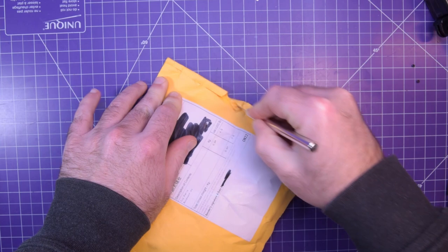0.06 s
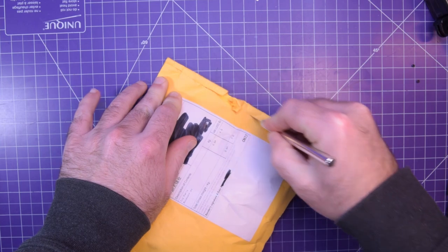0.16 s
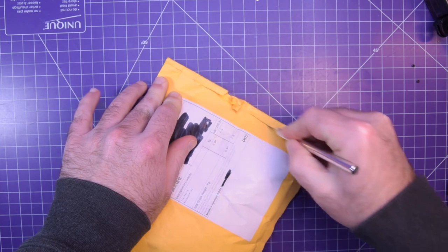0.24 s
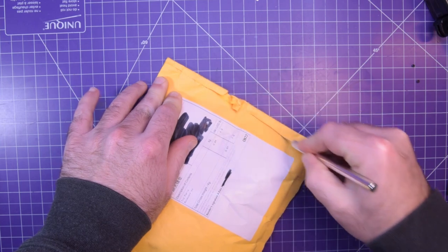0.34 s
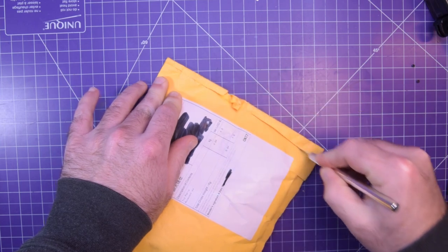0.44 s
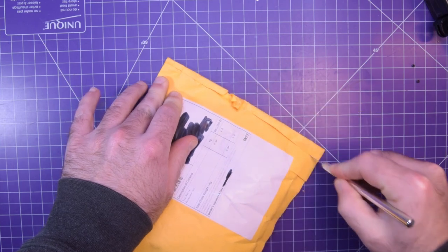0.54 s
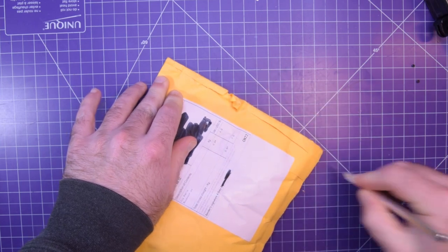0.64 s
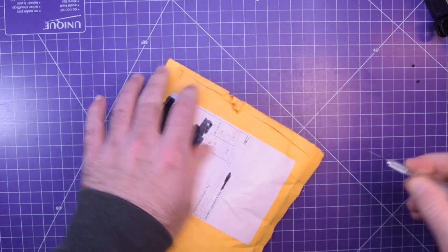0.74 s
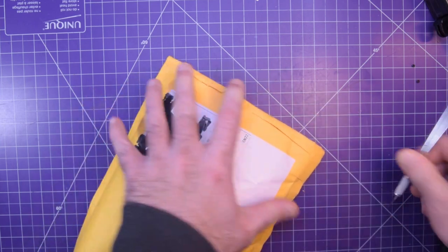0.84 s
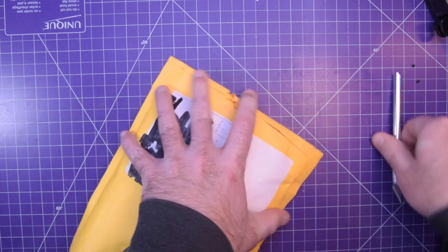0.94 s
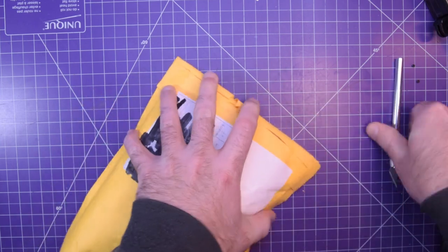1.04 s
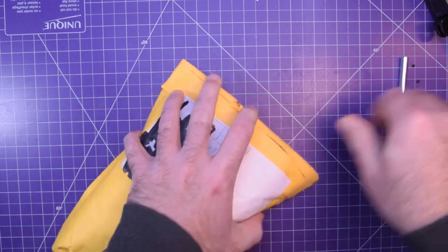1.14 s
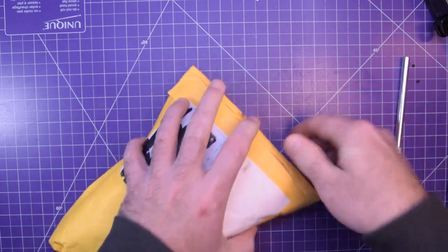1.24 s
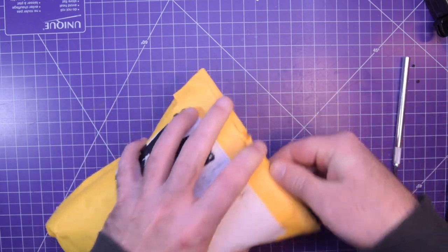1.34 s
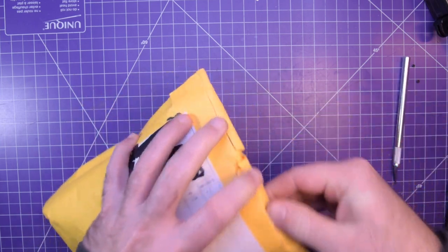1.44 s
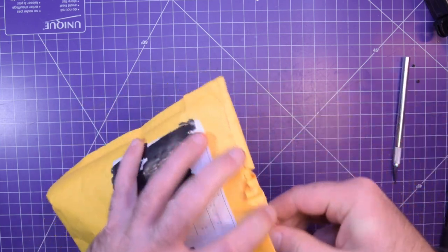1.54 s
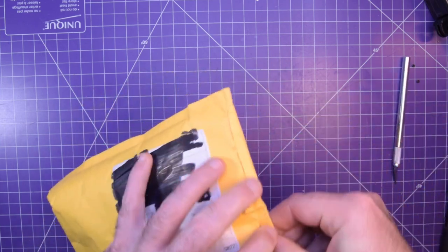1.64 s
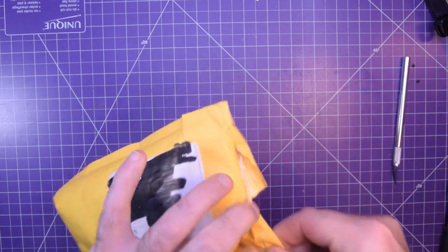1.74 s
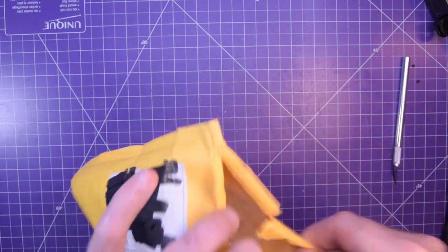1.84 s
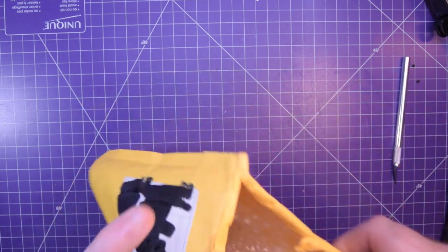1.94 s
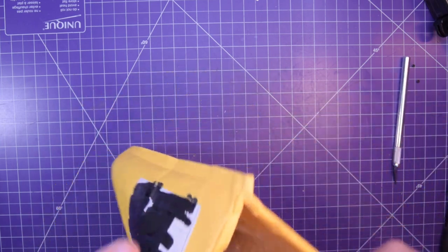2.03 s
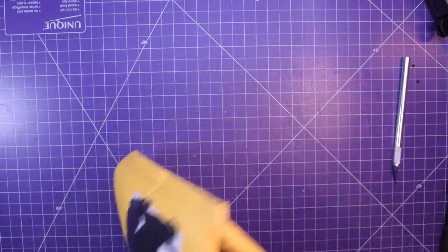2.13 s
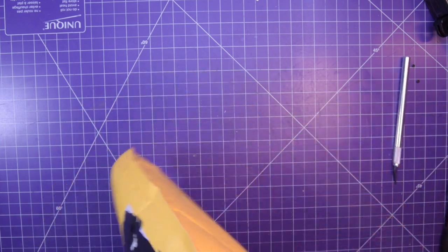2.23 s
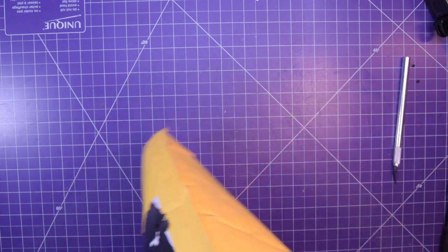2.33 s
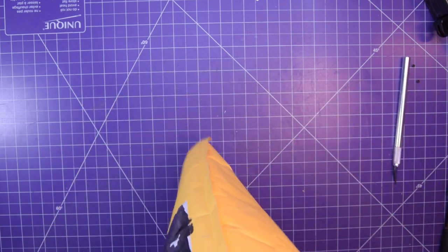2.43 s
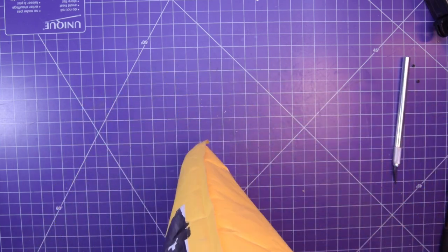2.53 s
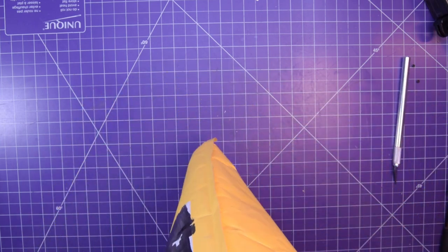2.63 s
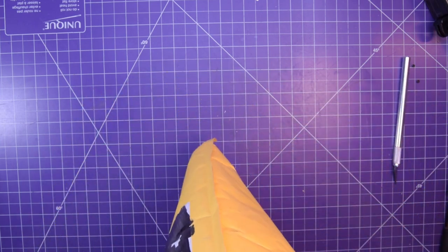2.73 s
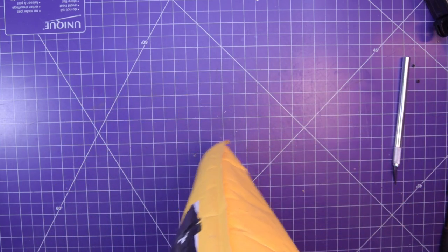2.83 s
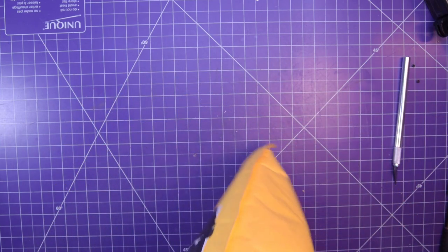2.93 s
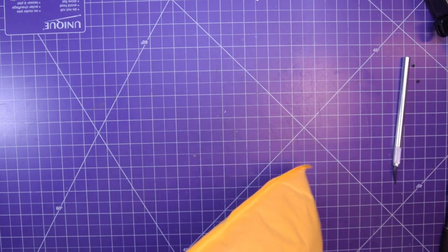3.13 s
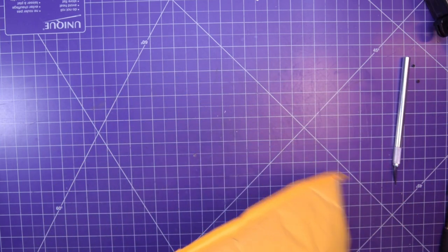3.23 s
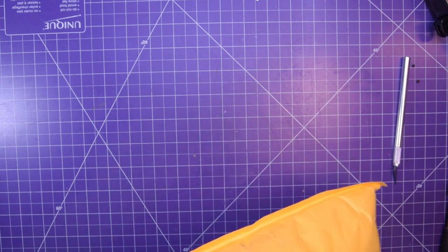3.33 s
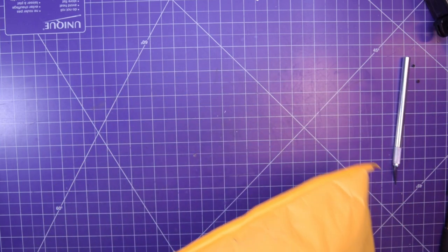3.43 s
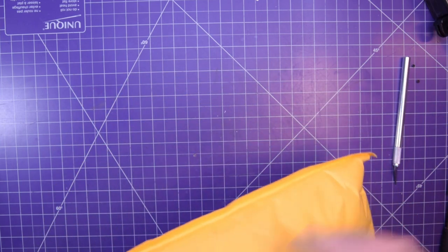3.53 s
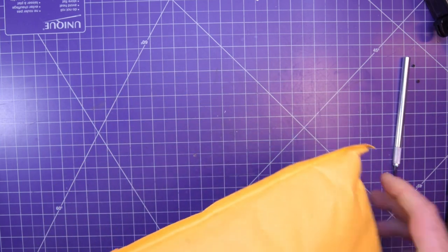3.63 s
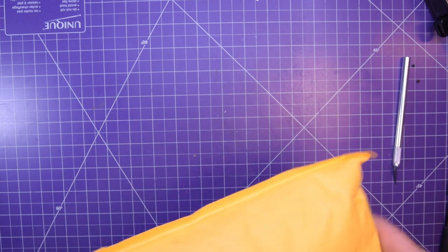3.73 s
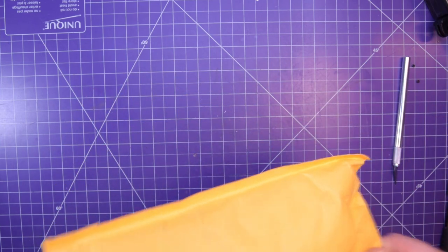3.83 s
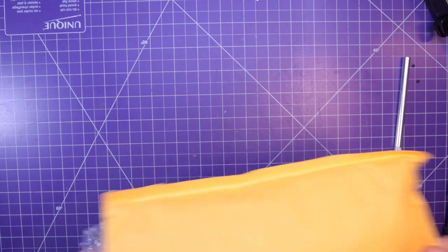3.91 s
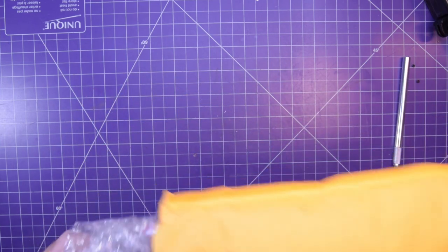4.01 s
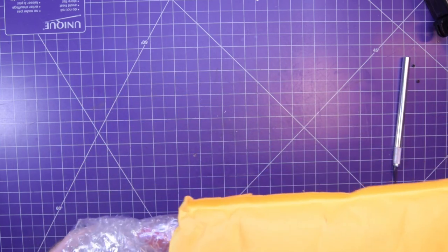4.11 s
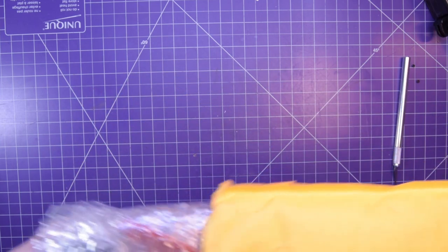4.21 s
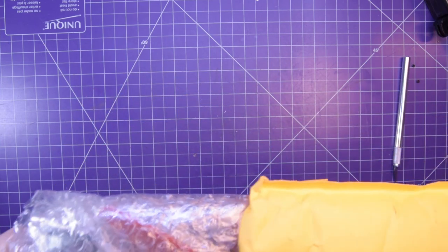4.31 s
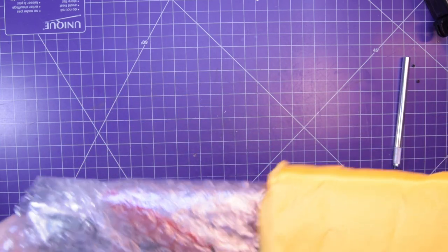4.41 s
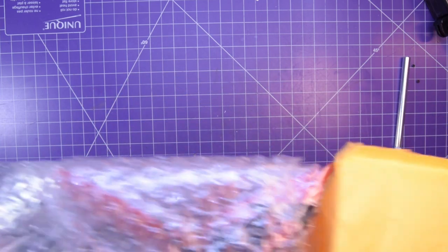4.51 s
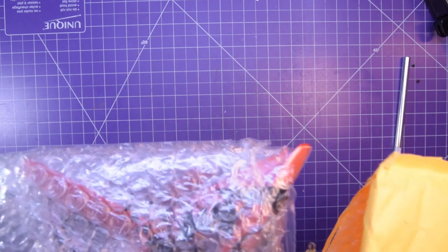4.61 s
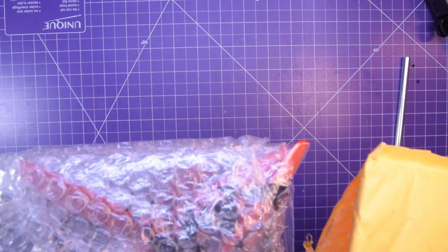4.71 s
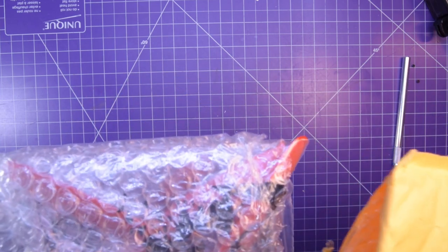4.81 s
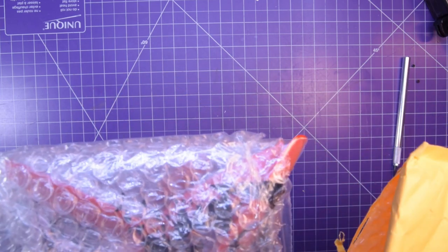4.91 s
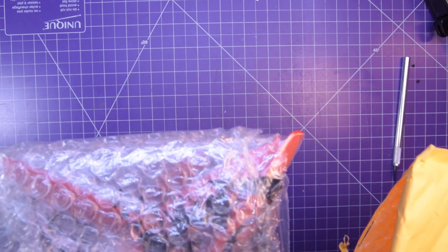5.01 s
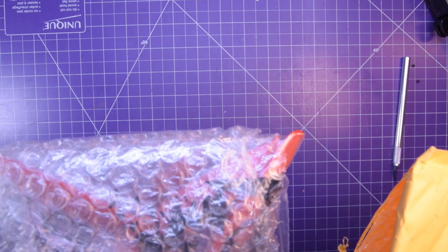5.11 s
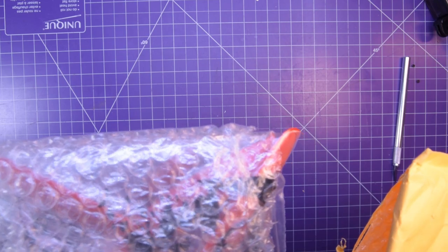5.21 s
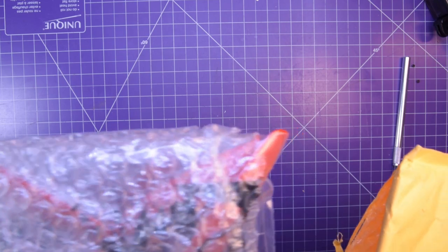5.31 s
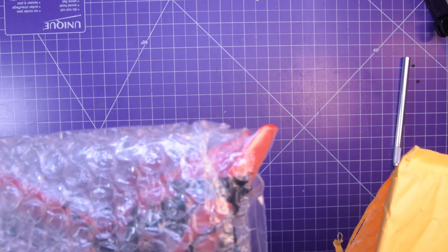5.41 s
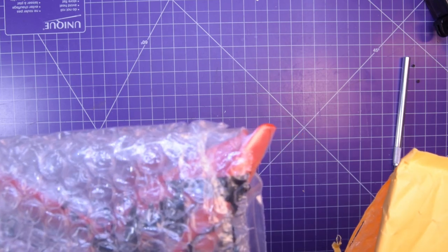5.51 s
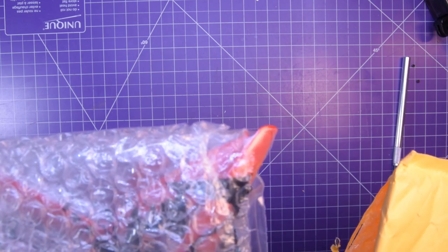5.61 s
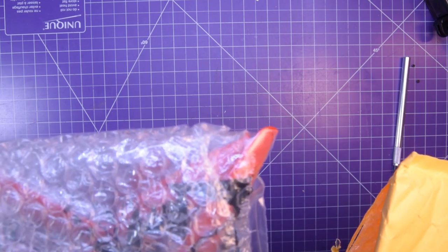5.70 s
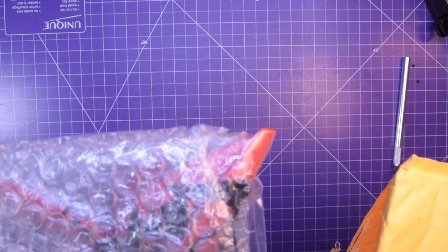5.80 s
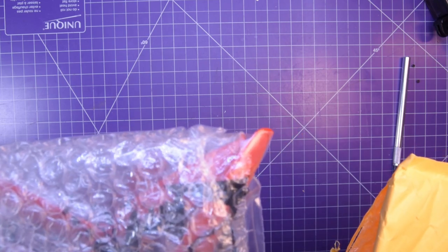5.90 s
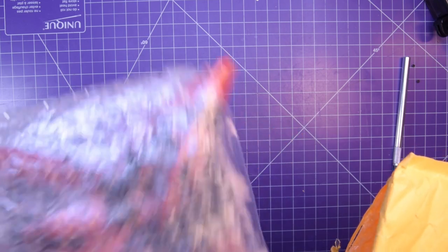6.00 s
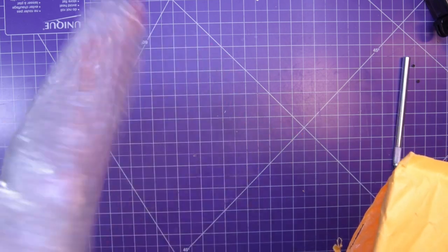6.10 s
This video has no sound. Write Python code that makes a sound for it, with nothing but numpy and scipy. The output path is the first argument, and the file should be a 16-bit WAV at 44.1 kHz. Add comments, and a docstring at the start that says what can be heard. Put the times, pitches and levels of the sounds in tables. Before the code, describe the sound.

Close up at a desk in a small, dry room: gritty paper cutting with small pops and a soft thud, then a hard little clatter as the knife lands on a mat. Stiff padded paper rustles, buckles and pops in dense bursts, with a lull midway. After the wrapped item slides free it is almost quiet, with only light plastic ticks and a last quick scrape over faint low rumble.

```python
"""A knife slits a padded paper mailer and lands with a short clatter; the mailer rubs, buckles and snaps open.
A bubble-wrapped item ticks and knocks in the hands and a faint breath glides, over a low rumble and faint hiss
in a small, dry room. Rubbing: random slips and smooth noise through surface colours and modes, levelled by hand
strokes. Blows: a crack and a noise flutter ring the object's modes. Thuds: low decaying sines. One microphone
hears all of it, with a desk reflection and a short noise-tail reverb."""
import sys
import numpy as np
from scipy import signal
from scipy.fft import rfft, irfft, next_fast_len
from scipy.io import wavfile
from scipy.ndimage import uniform_filter1d

SR = 44100
rng = np.random.default_rng(int(sys.argv[2]) if len(sys.argv) > 2 else 0)


def master_out(mix):
    """Clip the mix to full scale and print it as 16-bit PCM to the path in sys.argv[1]."""
    frames = np.transpose(np.atleast_2d(mix))
    ceiling = np.clip(frames, -1, 1)
    pcm = np.round(ceiling * 32767).astype(np.int16)
    wavfile.write(sys.argv[1], SR, pcm)


N = 271215

# Levels in the tables are relative: each source's own gain follows.
# edges of the zones body, flex, crackle, hiss: edge_hz
ZONE_EDGES_HZ = [200, 650, 1600, 4000, 14000]

# room rumble spectrum: freq_hz, level_db
RUMBLE_COLOUR = [(20, -32.5), (45, -25.5), (65, -20.5), (76, -6), (87, 5), (102, -4), (122, 3.5), (150, -1),
                 (195, -11), (260, -17), (400, -21), (700, -32.5), (1500, -38), (4000, -61)]
# faint hiss spectrum, room and channels: freq_hz, level_db
HISS_COLOUR = [(200, -2.5), (1000, -5), (3000, -6.5), (5000, 0), (10000, -6), (12000, -9.5), (15000, -43)]
CUTOFF_HZ = 15600
RADIATION_HZ = 70  # small sources radiate little below this

# Blow tables: ring and decay of each blow, level over 10 ms, spectral tilt and narrowing around the ring.
# wrapped item knocks under the fingers: start_s, ring_hz, decay_s, level_db, tilt_db_per_octave, focus_db_per_octave
ITEM_KNOCKS = [(5.1285, 1430, 0.0012, -37.5, 1.5, 11.5), (5.137, 5140, 0.0018, -56, 1, 6)]
# wrapped item resonances: freq_hz, width_hz, gain_db
ITEM_MODES = [(692, 41, 30.5), (1330, 150, 17), (1500, 130, 25), (2200, 88, 16), (2990, 260, 29),
              (3370, 240, 22), (4300, 200, 23), (5040, 180, 27)]
# finger presses an air cell: start_s, ring_hz, decay_s, level_db, tilt_db_per_octave, focus_db_per_octave
CELL_POPS = [(5.465, 2560, .002, -50, 2, 7), (5.467, 1700, 0.0025, -42.5, -3, 17),
             (5.4695, 1030, 0.0027, -51.5, 1.5, 23)]
# pressed cell resonances: freq_hz, width_hz, gain_db
POP_MODES = [(1030, 63, 10), (1330, 70, 6), (1700, 65, 12), (2100, 90, 4.3), (2420, 74, 4),
             (2750, 110, 5.5)]
FINGER_CUT_HZ = 2800
# bubble wrap ticks: start_s, ring_hz, decay_s, level_db, tilt_db_per_octave, focus_db_per_octave
WRAP_TICKS = [(2.629, 6450, 0.0015, -47.5, 15, 15), (2.6705, 6900, 0.002, -50, 10, 10),
              (2.7615, 4020, 0.0018, -61, 8, 3), (2.838, 1310, 0.004, -45.5, -1, 22),
              (2.8555, 5630, .003, -49, 4.5, 12), (4.6915, 1950, .0015, -46.5, -0.5, 3),
              (4.7235, 7000, .0012, -48, 2, 3), (4.7332, 3950, 0.0015, -38.5, 6, -2),
              (4.7535, 6500, .001, -56, 0, 3), (4.7741, 3950, 0.0053, -50, 7, 3),
              (4.7895, 2000, 0.0011, -53, 4, -4), (4.8205, 6500, 0.0019, -56, 5, 5),
              (4.837, 1550, .0015, -55, 3, 3), (5.1885, 3100, .002, -61, -4, 8),
              (5.3334, 6000, 0.0068, -66, 1, 9), (5.373, 1600, .0015, -58.5, -1, 3),
              (5.6043, 6420, .0038, -56, 3.5, 10), (6.0283, 1330, 0.0013, -39, 2, 18),
              (6.0885, 1400, 0.0018, -36, -2, 7), (6.1186, 2830, 0.0018, -20.5, 2, -1.5)]
# bubble wrap resonances: freq_hz, width_hz, gain_db
WRAP_MODES = [(692, 190, 4), (1480, 140, 6.7), (2010, 76, 8), (2870, 310, 1.06), (3950, 158, 9.4),
              (4390, 200, 3), (6420, 110, 10), (7250, 300, 2)]
# rubbed wrap spectrum: freq_hz, level_db
WRAP_COLOUR = [(200, -21.5), (500, -16.5), (900, -2), (1400, -5), (2500, -3.5), (4400, -9), (5500, -12.5),
               (8000, -11.5), (11000, -16), (15000, -37.5)]

# Stroke tables: swell is the level change over the hold.
# Positive heft is fuller and duller (flat palm), negative is thinner (edge).
# wrap settles and is held: start_s, length_s, level_db, swell_db, heft_db
WRAP_MOVES = [(4.69, 0.14, -69.5, -7, -7), (4.85, 1.22, -81.5, -6.5, 3)]
# wrap drags on the mat as it is lifted: start_s, length_s, level_db, swell_db, heft_db
WRAP_DRAGS = [(6.04, 0.048, -50.5, 0.5, -1.5), (6.098, .052, -52, 8, 0.5)]
# air cells under that drag: freq_hz, width_hz, gain_db
CELL_MODES = [(1400, 300, 16), (2100, 110, 0), (2920, 440, 5), (4350, 340, 0)]
# a faint breath: start_s, length_s, level_db, swell_db, heft_db, ring_start_hz, ring_end_hz
BREATHS = [(2.6, .035, -73, 3, -13, 1400, 1470), (2.645, 0.052, -76, 2, 4, 1526, 1560),
           (2.725, 0.036, -76, -1.5, -13, 1400, 1430), (2.772, 0.023, -78, -2, 0, 1480, 1520),
           (2.867, 0.064, -66.5, 5, 4, 1408, 1590)]
# resonances of the breath: multiple_of_lowest_resonance, width_hz, gain_db
BREATH_MODES = [(1, 169, 0.5), (1.74, 198, -13)]
# hands, desk and contents slide on the mailer: start_s, length_s, level_db, swell_db, heft_db
RUBS = [(0.794, 0.16, -59.5, -12.5, 7), (1.003, 0.14, -51.5, 1, 8.5), (1.165, 0.19, -51, -2, 8),
        (1.41, 0.18, -47.5, -2.5, 5), (1.613, 0.14, -48.5, 2.5, -1), (1.805, 0.059, -36.5, 5, 1.5),
        (1.889, 0.14, -43.5, -9, -4), (2.03, 0.15, -53.5, 4, -1), (2.17, 0.11, -50.5, 9, 0),
        (2.343, 0.037, -43.5, 4, 2), (2.404, 0.11, -47.5, 4.5, -12.5), (2.938, 0.11, -50.5, 0, -8.5),
        (3.058, 0.16, -48, 13, -6.5), (3.276, 0.18, -47, -9.5, -2), (3.444, 0.11, -48, 14, 0),
        (3.658, 0.22, -60, -15, 1.5), (3.843, 0.11, -42, 5.5, 2), (3.981, 0.2, -41, -4.5, 1),
        (4.216, 0.044, -48.5, 4, 0.5), (4.29, 0.078, -42, -1, 0.5), (4.388, 0.17, -51.5, 1, -4.5),
        (4.525, 0.1, -43, 4.5, -0.5)]
# rubbed mailer spectrum: freq_hz, level_db
MAILER_COLOUR = [(88, -39), (150, -22), (239, -7), (428, -2.5), (572, -5), (912, -7), (1110, -6.5),
                 (1540, -6), (2410, -11.5), (2810, -12.5), (3690, -12.5), (7000, -12), (10700, -16.5),
                 (13000, -24), (15500, -47.5)]
# mailer resonances: freq_hz, width_hz, gain_db
MAILER_MODES = [(458, 39, -0.5), (741, 51, -3), (915, 120, -9), (1500, 47, -4), (2770, 260, -3),
                (4130, 67, -2.5)]
# mailer buckles: start_s, ring_hz, decay_s, level_db, tilt_db_per_octave, focus_db_per_octave
PAPER_SNAPS = [(0.715, 490, 0.0052, -41, -3, -1), (0.8007, 716, 0.0025, -33.5, 3.5, 7.5),
               (0.805, 750, 0.0026, -34.5, -0.5, 10), (0.9125, 810, 0.01, -44.5, 6, 12),
               (1.2772, 474, 0.0016, -29, 2.2, 10), (1.3485, 483, 0.0014, -26.5, -0.8, 8),
               (1.383, 760, 0.0068, -38.5, 2, 9), (1.432, 520, 0.0046, -36.5, -2.5, 8),
               (1.503, 700, 0.0018, -43, -3, 5), (1.4607, 5800, 0.0072, -31.5, 30, 21),
               (1.5405, 1190.0, 0.0049, -33.5, -0.5, 11), (1.5525, 846, 0.0031, -37, -3, -2),
               (1.7445, 2900, 0.0026, -40.5, 1, 5), (1.627, 1920, 0.0021, -28, 0.3, 6),
               (1.7111, 6740, 0.004, -37, 4, -2), (1.8004, 1220, 0.0085, -28, -0.5, 1.5),
               (1.8205, 830, 0.0024, -25, 2, 10), (1.8418, 500, 0.0052, -29, -8, 4.5),
               (1.8625, 1120, 0.008, -22, -2.5, 1.5), (1.8945, 865, 0.0041, -32.5, -6, 16),
               (1.984, 900, 0.0031, -42, -2, -5), (1.8555, 696, 0.004, -33, -2, 5),
               (1.9125, 1500.0, 0.006, -27.5, -1.5, 1.5), (1.9431, 1410, 0.0055, -25.5, -6, 16.5),
               (1.9915, 2050, 0.0025, -34.5, 1.5, -9), (1.995, 915.0, 0.0031, -25.5, -0.5, 5.5),
               (2.122, 1690, 0.0031, -46.5, -2, 11), (2.372, 890, 0.0015, -42, 4.5, 8),
               (2.158, 1400.0, 0.01, -34, -0.5, 2.5), (2.277, 1160, 0.0029, -38, -1, 8.5),
               (2.47, 663, 0.0029, -39, -3.5, -6), (2.9365, 1300, 0.0074, -43, 0.5, 6),
               (3.0019, 2250, 0.00095, -22.5, 3.5, 6.5), (3.0025, 3202, 0.0033, -25.5, 0.5, 7.5),
               (3.2082, 2420, 0.0021, -27.5, -2, 8.5), (3.2766, 1620, 0.0028, -35.5, -10, 16.5),
               (3.2868, 860, 0.0032, -27.5, 0.5, 9.5), (3.3045, 1000, 0.0012, -38.5, 1, 7),
               (3.4635, 1500, 0.0039, -38.5, 1, 6), (3.472, 900, 0.0015, -41, -3, 25),
               (3.5355, 845, 0.0017, -35, 1, 20), (3.5709, 2680, 0.0058, -33, -0.5, 1.5),
               (3.574, 3750, 0.017, -33, 4.5, 5), (3.5755, 490, 0.0041, -28, -4, 8),
               (3.592, 340, 0.0046, -39, 1, 10), (3.6838, 1210, 0.0013, -22.5, -0.5, 5),
               (3.6855, 520, 0.004, -29.5, 2.5, 5.5), (3.7624, 467, 0.0081, -42, 0, 3.5),
               (3.847, 445, 0.0037, -33.5, -5.5, -3), (3.861, 680, 0.0015, -33, -3.5, -1),
               (3.8675, 1000, 0.0012, -46, 4, 6), (3.8707, 1460, 0.0049, -28, -0.9, 5),
               (3.9036, 3100, 0.0046, -31.5, -7, 6.5), (3.9276, 950, 0.0043, -26, -2, -3),
               (3.9325, 1310, 0.0023, -42, 1.5, 8), (3.962, 450, .003, -33.5, -7, 13),
               (4.0105, 2400, 0.0021, -32.5, -7, 5), (4.0225, 2900, 0.0043, -36, -2, 8),
               (4.0335, 1290, 0.0032, -34, 2, 6), (4.0997, 1110, 0.0025, -34.5, -3, -4),
               (4.139, 1270, 0.0042, -36, 0.5, 2), (4.177, 1120, 0.0024, -39.5, -2.5, -4),
               (4.3, 1190, .002, -42, 4, 11), (4.0825, 736, 0.0031, -28.5, -1.5, 9),
               (4.122, 367, 0.0081, -35.5, 1, 22), (4.1632, 2150, 0.0021, -35.5, 1, 0.5),
               (4.2868, 318, 0.003, -32, -3.5, -4), (4.3287, 1610, 0.0069, -28, -3.5, 14),
               (4.6065, 2750.0, 0.0047, -29, 2.5, 6), (4.6095, 2750, .0012, -35, 1, -2),
               (4.6255, 1160, .002, -38, -2, -1), (4.637, 1340, 0.0052, -33, -4.5, 7),
               (4.641, 440, .004, -36.5, -2.5, 5)]
# spectrum shared by all blows, before zone balancing: freq_hz, level_db
SNAP_COLOUR = [(30, -51), (90, -21), (170, -17.5), (310, -4), (400, -1.5), (600, -3), (900, 3.5),
               (2700, 5.5), (4200, -0.5), (5500, -5.5), (8000, -8.5), (11000, -13), (13000, -25),
               (15000, -41.5)]
# heavier pushes thud on the desk: start_s, ring_hz, decay_s, level_db
THUDS = [(0.239, 167, 0.012, -24), (0.711, 248, 0.0059, -26.5), (1.054, 200, 0.013, -33.5),
         (1.145, 241, 0.011, -31), (2.935, 338, .018, -36), (3.573, 245, 0.0072, -22.5),
         (4.12, 253.5, 0.01, -31), (4.283, 249, 0.0051, -26)]
THUD_RISE_S = 0.003
# knife lands and bounces: start_s, ring_hz, decay_s, level_db, tilt_db_per_octave, focus_db_per_octave
KNIFE_DOWN = [(1.0503, 2200, 0.0057, -21, 0, 5), (1.0535, 3940, .006, -39, 5, 9.5),
              (1.0675, 2200, 0.004, -27, -0.5, 5), (1.0762, 2200, 0.0022, -32, -4.5, 9.5),
              (1.0825, 1900, 0.006, -35.5, -1.5, 7), (1.1396, 1820, 0.004, -22.5, -3.5, 6.5),
              (1.1432, 2100, 0.0049, -23.5, -6.5, 10), (1.1535, 1500, 0.008, -34, -5, 9.5),
              (1.1708, 1117, 0.0088, -33, -1, 2)]
# knife handle on the cutting mat: freq_hz, width_hz, gain_db
KNIFE_MODES = [(480, 55, -0.5), (765, 60, -2.5), (1000, 80, 1.5), (1510, 90, -1.5), (1930, 60, 3.5),
               (2250, 70, 9.5), (2580, 130, 2.5), (3270, 63, 3.5), (4020, 45, -2), (4950, 260, 6.5)]
# blade pulls through the paper: start_s, length_s, level_db, swell_db, heft_db
CUTS = [(0.0, 0.076, -40.5, 0.5, 4), (0.107, 0.058, -42.5, 5.5, -11), (0.247, 0.13, -40, -1, 4),
        (0.411, 0.14, -40, -1.5, 4.5), (0.563, 0.071, -43.5, -3.5, 1), (0.66, 0.018, -43, 4, 7.5),
        (0.695, 0.0076, -43, -6, -2)]
# slit paper spectrum: freq_hz, level_db
SLIT_COLOUR = [(88, -20), (150, -8), (274, -24), (428, -10.5), (631, -15), (722, -13), (912, -3),
               (1130, -5), (1370, -2.5), (2100, -9), (2600, -7.5), (3900, -12), (5030, -17), (10100, -20),
               (14600, -25.5), (15500, -53)]
# slit paper resonances: freq_hz, width_hz, gain_db
SLIT_MODES = [(440, 40, -4), (747, 45, 8.5), (920, 45, -2.5), (1445, 97, -10.5), (1970, 180, -6)]
# blade catches and breaks through: start_s, ring_hz, decay_s, level_db, tilt_db_per_octave, focus_db_per_octave
BLADE_CATCHES = [(0.012, 435, 0.0036, -35.5, -16, 6), (0.1055, 2500, 0.0047, -27.5, 1.8, 2.5),
                 (0.1272, 1765, 0.0051, -35.5, -1.5, -2), (0.2275, 600, 0.0046, -32.5, -1.5, 15),
                 (0.1512, 1193, 0.01, -37, -6.5, 11), (0.236, 1250, 0.0048, -21, 0.5, 2.5),
                 (0.2415, 750, 0.0046, -22, -4, -5.5), (0.243, 420, 0.012, -25.5, 0, 11.5),
                 (0.2925, 1500, 0.0039, -34, -7, 8), (0.3055, 940, 0.0012, -33, -6, 13),
                 (0.4145, 920, 0.0035, -31.5, 8, 15), (0.4955, 1700, 0.0013, -37.5, -8, 22),
                 (0.532, 2670, 0.0022, -33.5, 1, 5.5), (0.6025, 3720, 0.0034, -36.5, -2, 0.5),
                 (0.6605, 765, 0.0062, -38, 14.5, 11.5), (0.7095, 730, 0.0038, -29, -3.5, -2.5)]

RISE_DB_PER_S, FALL_DB_PER_S = 501, 352  # rise is the default
# zone levels of a plain stroke: level_db
RUB_BALANCE_DB = [-7.5, -3, 0, -2.5]
# how far each zone follows heft: share
HEFT_SHARE = [1, 0.52, 0.081, -0.37]
FIRM_DB, BODY_GROWTH = -39.5, 0.59  # extra body dB per dB above FIRM_DB, less below
# random crinkles while the paper moves; level relative to the stroke
CRINKLES_PER_S, CRINKLE_DB, CRINKLE_SPREAD_DB = 48, -3, 0
CRINKLE_LOW_HZ, CRINKLE_HIGH_HZ, CRINKLE_DECAY_S = 620, 5200, 0.0019
CRINKLE_FOCUS_DB_PER_OCTAVE = 4
FACET_CUT_SHARE, FACET_CUT_MAX_HZ = 0.6, 380  # small patches: bass cut as a share of their ring
FLEX_LOW_HZ, FLEX_HIGH_HZ, FLEX_Q = 528, 9840, 14  # resonances that swell as a sheet bends


def from_db(db):
    """Decibels to amplitude ratio."""
    return 10 ** (np.asarray(db) / 20)


def rms_one(x):
    """Scale to unit RMS."""
    return x / np.sqrt(np.mean(x ** 2) + 1e-20)


def at_hz(points, hz):
    """Read a spectrum table on a log-frequency axis."""
    freq_hz, level_db = np.transpose(points)
    return np.interp(np.log(np.maximum(hz, 1)), np.log(freq_hz), level_db)


def drift(rate_hz):
    """Random line of unit RMS with rate_hz new knots a second."""
    knots = rng.standard_normal(N // 20)
    return rms_one(np.interp(np.arange(N) / SR * rate_hz, np.arange(len(knots)), knots))


def colour(x, points, size=8192):
    """Minimum-phase filter with the given spectrum: nothing sounds early."""
    log_gain = at_hz(points, np.fft.rfftfreq(size, 1 / SR)) * np.log(10) / 20
    cepstrum = irfft(log_gain)
    cepstrum[1:size // 2] *= 2
    cepstrum[size // 2 + 1:] = 0
    impulse = irfft(np.exp(rfft(cepstrum)))
    return signal.fftconvolve(x, impulse)[:len(x)]


def resonate(x, modes):
    """Direct sound plus the ringing of each two-pole mode."""
    out = x
    for hz, width_hz, db in modes:
        r = np.exp(-np.pi * width_hz / SR)
        zeros = np.array([1, 0, -1]) * (1 - r * r) / 2
        poles = [1, -2 * r * np.cos(2 * np.pi * hz / SR), r * r]
        out = out + from_db(db) * signal.lfilter(zeros, poles, x)
    return out


def split(x):
    """Four complementary bands, one per zone."""
    size = next_fast_len(len(x), True)
    f = np.fft.rfftfreq(size, 1 / SR)
    inner = [1 / (1 + (f / edge) ** 10) for edge in ZONE_EDGES_HZ[1:-1]]
    below = [0 * f] + inner + [1 + 0 * f]
    return irfft(rfft(x, size) * np.diff(below, axis=0), size)[:, :len(x)]


def zone_centres_hz():
    """Geometric middle of each zone."""
    return np.sqrt(np.multiply(ZONE_EDGES_HZ[:-1], ZONE_EDGES_HZ[1:]))


def stroke_levels(strokes, t, rise_db_per_s=RISE_DB_PER_S):
    """Zone gains at times t: strokes rise, hold and fall; firm ones move more of the sheet's body."""
    power = np.full((4, len(t)), 1e-18)
    for start_s, length_s, level_db, swell_db, heft_db, *_ in strokes:
        progress = np.clip((t - start_s) / length_s, 0, 1)
        early_s = np.maximum(start_s - t, 0)
        late_s = np.maximum(t - start_s - length_s, 0)
        push_db = level_db + swell_db * (progress - 0.5)
        push_db = push_db - rise_db_per_s * early_s - FALL_DB_PER_S * late_s
        balance_db = np.array(RUB_BALANCE_DB) + heft_db * np.array(HEFT_SHARE)
        zone_db = push_db + balance_db[:, None]
        zone_db[0] += BODY_GROWTH * (push_db - FIRM_DB)
        power += from_db(zone_db) ** 2
    return np.sqrt(power)


def slips(per_s, spread_db, pitched_db, q, count=18):
    """Sudden slips of uneven size; each also plucks one small facet with its own pitch."""
    sizes = from_db(spread_db * np.minimum(rng.exponential(1, N), 4)) * rng.choice([-1, 1], N)
    clicks = sizes * (rng.random(N) < per_s / SR)
    dealt, facets = rng.integers(0, count, N), 0
    for k, hz in enumerate(np.geomspace(ZONE_EDGES_HZ[1], ZONE_EDGES_HZ[-1], count)):
        plucks = clicks * (dealt == k) + 1e-18
        facets = facets + signal.lfilter(*signal.iirpeak(hz, q, fs=SR), plucks)
    return rms_one(rms_one(clicks) + from_db(pitched_db) * rms_one(facets))


def flexing(x, ring_db, swing_db, per_s, count=22, step=128):
    """The sheet changes shape under the hand, so narrow resonances swell and fade independently."""
    out, t = x.copy(), np.arange(0, N, step) / SR
    moments_s = np.arange(400) / per_s
    for hz in np.geomspace(FLEX_LOW_HZ, FLEX_HIGH_HZ, count):
        gains = from_db(ring_db + swing_db * np.clip(rng.standard_normal(len(moments_s)), -2, 2))
        swell = np.repeat(np.interp(t + rng.random(), moments_s, gains), step)[:N]
        out += swell * signal.lfilter(*signal.iirpeak(hz, FLEX_Q, fs=SR), x)
    return rms_one(out)


def rubbing(strokes, grains, spectrum, modes, smooth_db, judder_db, judder_hz, level_db,
            rise_db_per_s=RISE_DB_PER_S, window=2205):
    """Clumped slips on a smooth hiss ring the surface; strokes set the running level of each zone."""
    t = np.arange(N) / SR
    force = grains + from_db(smooth_db) * rng.standard_normal(N)
    force = force * from_db(judder_db * drift(judder_hz))
    bands = split(resonate(colour(force, spectrum), modes))
    # flatten the running level, then impose the strokes
    bands = bands / np.sqrt(uniform_filter1d(bands ** 2, size=window, axis=1) + 1e-18)
    coarse = t[::64]
    gains = stroke_levels(strokes, coarse, rise_db_per_s)
    return from_db(level_db) * sum(band * np.interp(t, coarse, gain) for band, gain in zip(bands, gains))


def blow_balance(hz, tilt_db, focus_db):
    """Zone shares of a blow's energy in dB: a tilted hump falling on both sides of its ring."""
    octaves = np.log2(zone_centres_hz() / hz)
    db = tilt_db * octaves - max(focus_db, 0) * np.abs(octaves)
    return db - 10 * np.log10(np.sum(from_db(db) ** 2))


def blows(table, modes, crack_db, rise_s, ring_db, ring_q, level_db, size=4096):
    """A sharp crack and dying flutter ring the object's modes and one pitch per blow."""
    out, t = np.zeros(N + size), np.arange(size) / SR
    usual_decay_s = np.median(np.array(table)[:, 2])
    noises = rng.standard_normal((len(table), size))
    for (start_s, hz, decay_s, db, tilt_db, focus_db), noise in zip(table, noises):
        flutter = noise * np.exp(-t / decay_s) * (1 - np.exp(-t / rise_s))
        force = flutter / np.linalg.norm(flutter)
        force[0] += from_db(crack_db) * usual_decay_s / decay_s  # shorter blows crack harder
        sound = colour(resonate(force, modes + [(hz, hz / ring_q, ring_db)]), SNAP_COLOUR, size=size)
        cut_hz = np.clip(FACET_CUT_SHARE * hz, 50, FACET_CUT_MAX_HZ)
        sound = signal.sosfilt(signal.butter(3, cut_hz, "high", fs=SR, output="sos"), sound)
        # correct each zone to its target level over 10 ms
        own_db = 10 * np.log10(np.sum(split(sound) ** 2, axis=1) / (SR / 100))
        zone_gain_db = db + blow_balance(hz, tilt_db, focus_db) - own_db
        start = round(start_s * SR)
        out[start:start + size] += colour(sound, np.c_[zone_centres_hz(), zone_gain_db], size=size)
    return from_db(level_db) * out[:N]


def crinkles(strokes, count=400):
    """Blow rows at random moments and pitches, as strong as the stroke that bends the paper."""
    when, pitch, chance = rng.random((count, 3)).T
    start_s = when * N / SR
    scatter_db = CRINKLE_SPREAD_DB * rng.standard_normal(count)
    db = 20 * np.log10(stroke_levels(strokes, start_s)[2]) + CRINKLE_DB + scatter_db
    hz = CRINKLE_LOW_HZ * (CRINKLE_HIGH_HZ / CRINKLE_LOW_HZ) ** pitch
    decay_s = np.full(count, CRINKLE_DECAY_S)
    focus_db = np.full(count, CRINKLE_FOCUS_DB_PER_OCTAVE)
    rows = np.c_[start_s, hz, decay_s, db, np.zeros(count), focus_db]
    moving = db > -75
    return rows[moving & (chance < CRINKLES_PER_S * N / SR / count)]


def background(rumble_db, hiss_db):
    """Coloured noise: low room rumble and a faint even hiss."""
    low, high = rng.standard_normal((2, N + SR))
    rumble = rms_one(colour(low, RUMBLE_COLOUR)[SR:])
    hiss = rms_one(colour(high, HISS_COLOUR)[SR:])
    return from_db(rumble_db) * rumble + from_db(hiss_db) * hiss


def room(x, t60_s, first_s, wet_db, treble_db):
    """Dense, quickly dying reflections from the nearby walls."""
    t = np.arange(SR // 2) / SR
    tail = rng.standard_normal(len(t)) * from_db(-60 * t / t60_s) * (t > first_s)
    tail = colour(tail / np.linalg.norm(tail), [(200, 1.5), (2500, -1.5), (9000, treble_db)])
    return from_db(wet_db) * signal.fftconvolve(x, tail)[:N]


def desk(x, lag_s, bounce_db):
    """The desk top reflects the sound to the microphone a little later."""
    return from_db(bounce_db) * np.interp(np.arange(N) - lag_s * SR, np.arange(N), x, left=0)


def radiate(x):
    """Small sources lose their deepest bass."""
    return signal.sosfilt(signal.butter(2, RADIATION_HZ, "high", fs=SR, output="sos"), x)


def desk_thuds(size=8192):
    """Padding softens each push, so the desk answers with one low, quickly dying note."""
    out, age_s = np.zeros(N + size), np.arange(size) / SR
    for start_s, hz, decay_s, db in THUDS:
        start = round(start_s * SR)
        envelope = (1 - np.exp(-age_s / THUD_RISE_S)) * np.exp(-age_s / decay_s)
        out[start:start + size] += from_db(db) * envelope * np.sin(2 * np.pi * hz * age_s)
    return out[:N]


def item_knocks():
    """Short blows ring the strong modes of the wrapped item."""
    return blows(ITEM_KNOCKS, ITEM_MODES, crack_db=-6, rise_s=0.00048, ring_db=0, ring_q=5.4, level_db=-6)


def cell_pops():
    """Air cells pop; the soft fingertip on the film takes away the treble."""
    pops = blows(CELL_POPS, POP_MODES, crack_db=-11, rise_s=0.0005, ring_db=12, ring_q=7.5, level_db=-3.5)
    return signal.sosfilt(signal.butter(5, FINGER_CUT_HZ, fs=SR, output="sos"), pops)


def bubble_wrap(fine_slips):
    """Film slips as the wrap is held, drags that stir its air cells, and resonant ticks."""
    film_slips = flexing(slips(per_s=450, spread_db=3.5, pitched_db=1, q=8.9),
                         ring_db=-3, swing_db=7.5, per_s=22)
    held = rubbing(WRAP_MOVES, film_slips, WRAP_COLOUR, [], smooth_db=2, judder_db=4, judder_hz=56,
                   level_db=0.5, rise_db_per_s=2000, window=4410)
    drag = rubbing(WRAP_DRAGS, fine_slips, WRAP_COLOUR, CELL_MODES, smooth_db=-3, judder_db=1,
                   judder_hz=150, level_db=0, rise_db_per_s=1199)
    ticks = blows(WRAP_TICKS, WRAP_MODES, crack_db=-23, rise_s=0.00048, ring_db=9.5, ring_q=8.5,
                  level_db=-10.5)
    return held + drag + ticks


def breath_ring(level_db):
    """A faint breath rings narrow resonances that glide in pitch as it goes."""
    t, ring, glide = np.arange(N) / SR, 0, []
    for start_s, length_s, *_, start_hz, end_hz in BREATHS:
        glide += [(start_s, start_hz), (start_s + length_s, end_hz)]
    phase = 2 * np.pi * np.cumsum(np.interp(t, *np.transpose(glide))) / SR
    for ratio, width_hz, db in BREATH_MODES:
        # narrow noise centred on the gliding resonance
        low_pass = signal.butter(2, width_hz / 2, fs=SR, output="sos")
        a, b = signal.sosfilt(low_pass, rng.standard_normal((2, N)))
        ring = ring + from_db(db) * rms_one(a * np.cos(ratio * phase) + b * np.sin(ratio * phase))
    coarse = t[::64]
    return from_db(level_db) * ring * np.interp(t, coarse, stroke_levels(BREATHS, coarse)[1])


def faint_breath(fine_slips):
    """A faint hiss of fine slips plus the gliding ring of the breath."""
    brush = rubbing(BREATHS, fine_slips, WRAP_COLOUR, [], smooth_db=-4, judder_db=4, judder_hz=46,
                    level_db=-2)
    return brush + breath_ring(level_db=8.5)


def knife_landing():
    """The knife's handle knocks and bounces, ringing its modes."""
    return blows(KNIFE_DOWN, KNIFE_MODES, crack_db=-9, rise_s=0.00012, ring_db=9, ring_q=4, level_db=0.06)


def blade_slit():
    """Blade slips through bending paper, with catches at break-through and small random snags."""
    blade_slips = flexing(slips(per_s=2000, spread_db=1, pitched_db=-9, q=9.4),
                          ring_db=-3, swing_db=5.5, per_s=20)
    slit = rubbing(CUTS, blade_slips, SLIT_COLOUR, SLIT_MODES, smooth_db=-6.5, judder_db=0,
                   judder_hz=340, level_db=-0.9)
    catches = blows(BLADE_CATCHES, SLIT_MODES, crack_db=-4, rise_s=0.00059, ring_db=-1, ring_q=18,
                    level_db=0.33)
    snags = blows(crinkles(CUTS), SLIT_MODES, crack_db=-5.5, rise_s=0.0003, ring_db=13, ring_q=3.4,
                  level_db=-3)
    return slit + catches + snags


def paper_mailer():
    """Paper slips under the hands, buckles in snaps and crinkles as it bends."""
    paper_slips = flexing(slips(per_s=2400, spread_db=3, pitched_db=-1.5, q=9.9),
                          ring_db=-9, swing_db=7.5, per_s=18)
    rubs = rubbing(RUBS, paper_slips, MAILER_COLOUR, MAILER_MODES, smooth_db=0.5, judder_db=1.07,
                   judder_hz=99, level_db=-0.5)
    snaps = blows(PAPER_SNAPS, MAILER_MODES, crack_db=-8.5, rise_s=0.0003, ring_db=5, ring_q=5.4,
                  level_db=-1.63)
    crinkling = blows(crinkles(RUBS), MAILER_MODES, crack_db=-9, rise_s=0.00049, ring_db=4, ring_q=10,
                      level_db=-4)
    return rubs + snaps + crinkling


def scene():
    """All sources reach one microphone, fed alike to two channels."""
    floor = background(rumble_db=-53.5, hiss_db=-98.5)
    fine_slips = slips(per_s=3100, spread_db=4, pitched_db=-14.5, q=6)
    contents = item_knocks() + cell_pops() + bubble_wrap(fine_slips)
    mailer = faint_breath(fine_slips) + paper_mailer()
    knife = knife_landing() + blade_slit()
    direct = radiate(contents + mailer + knife) + desk_thuds()
    near = direct + desk(direct, lag_s=0.0023, bounce_db=-23.5)
    reverb = room(near, t60_s=0.12, first_s=0.0046, wet_db=-13, treble_db=-1.5)
    sound = near + reverb + floor
    return np.array([sound, sound])


def record(dry, self_noise_db=-80):
    """Each channel adds a faint hiss of its own; the top is cut steeply."""
    hiss = np.array([rms_one(colour(noise, HISS_COLOUR)) for noise in rng.standard_normal((2, N))])
    low_pass = signal.ellip(10, 0.1, 80, CUTOFF_HZ, fs=SR, output="sos")
    return signal.sosfilt(low_pass, dry + from_db(self_noise_db) * hiss)


dry = scene()
out = record(dry)
master_out(out)
```